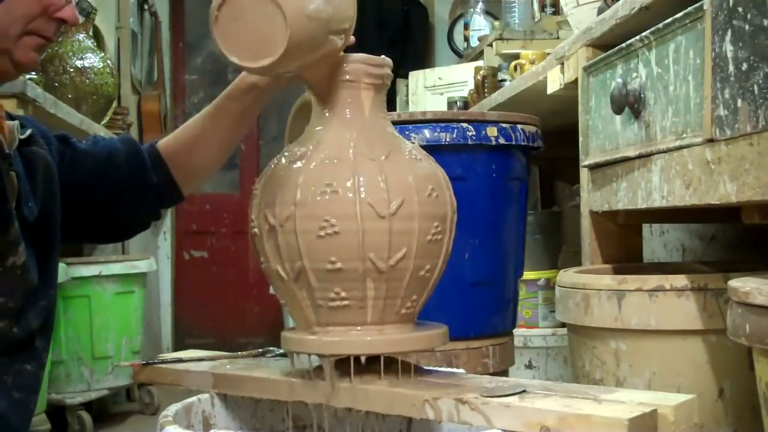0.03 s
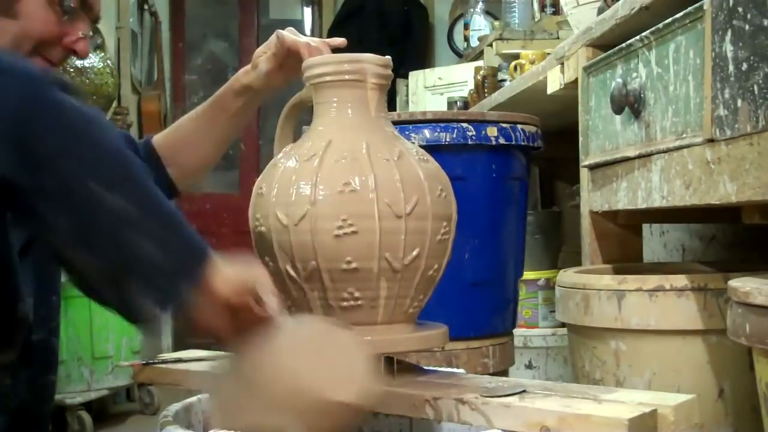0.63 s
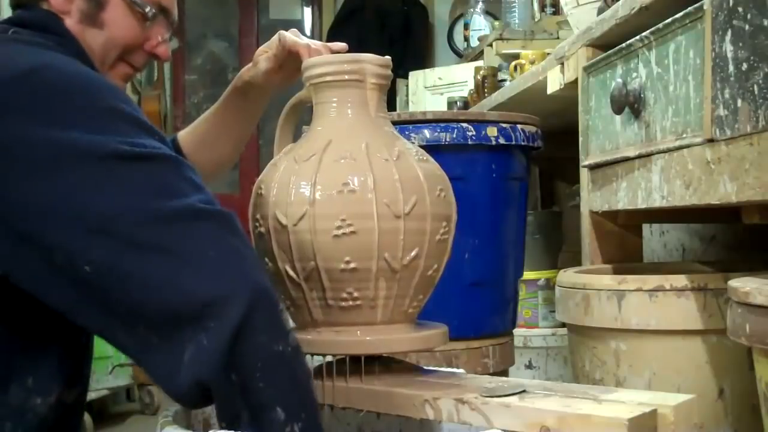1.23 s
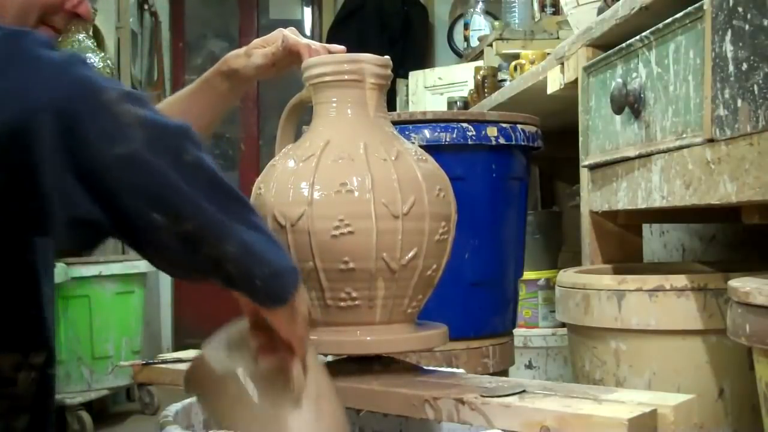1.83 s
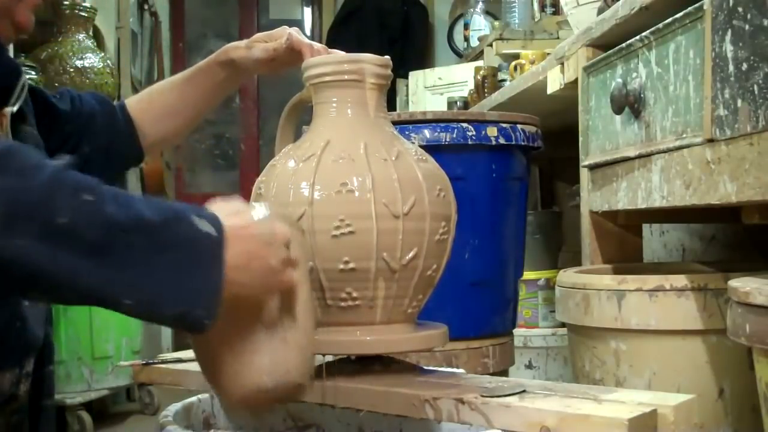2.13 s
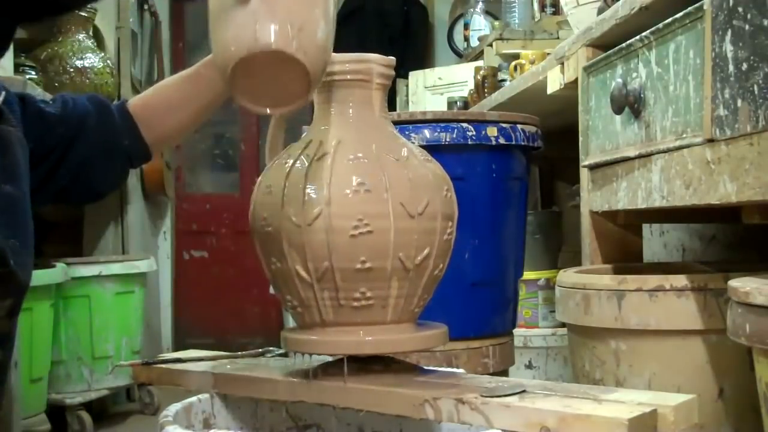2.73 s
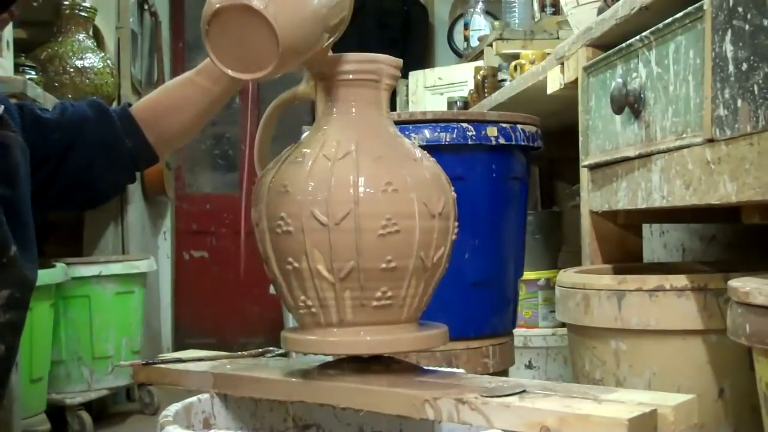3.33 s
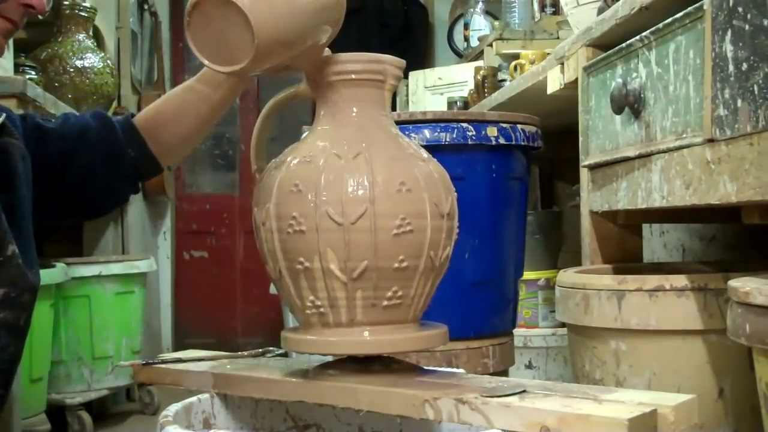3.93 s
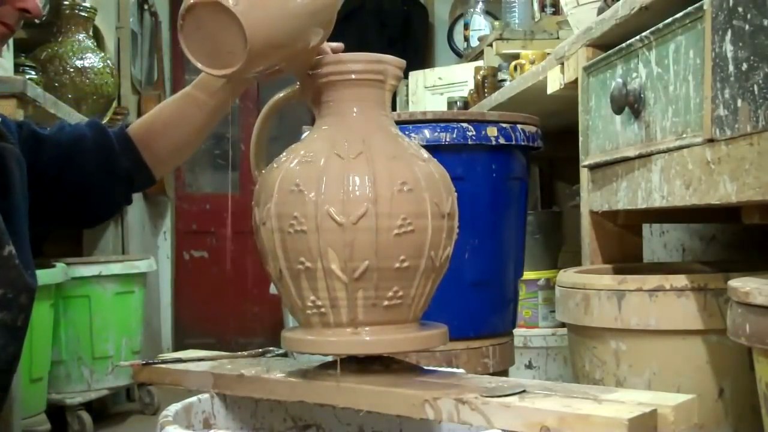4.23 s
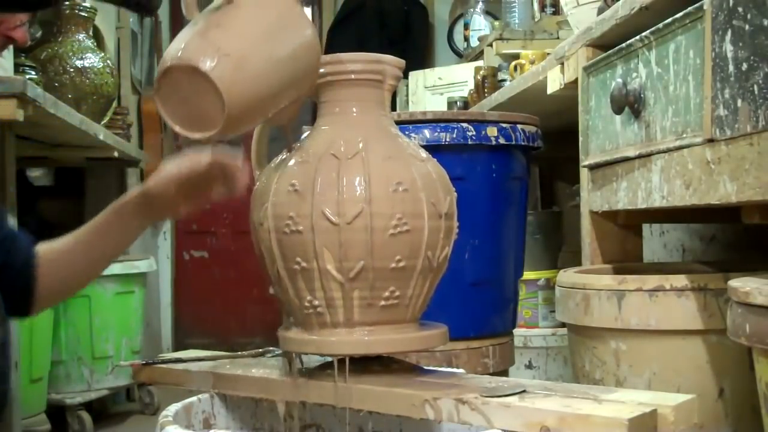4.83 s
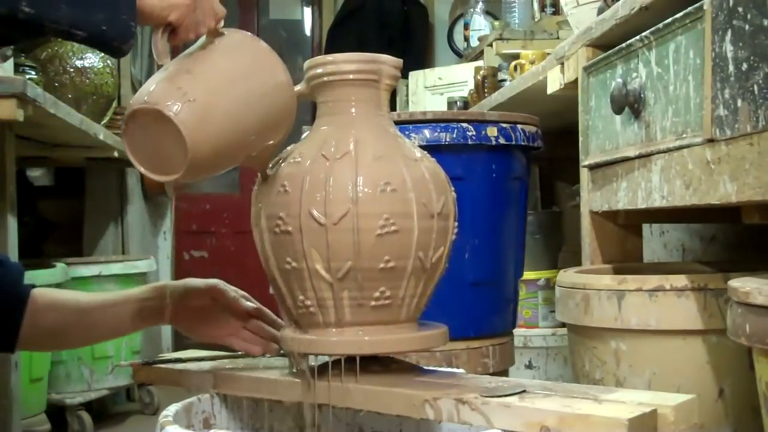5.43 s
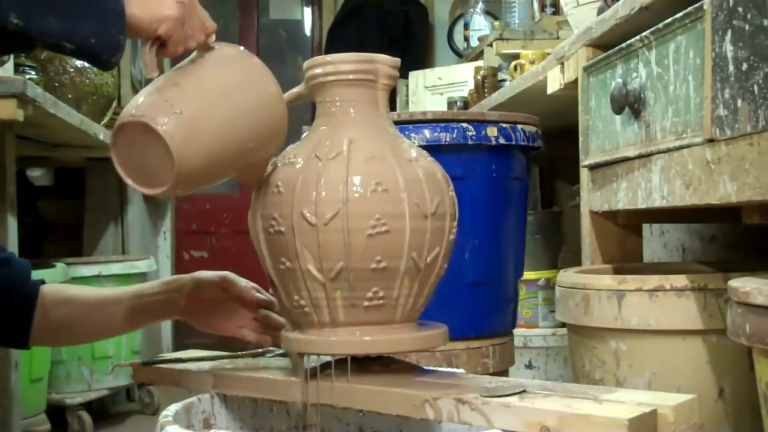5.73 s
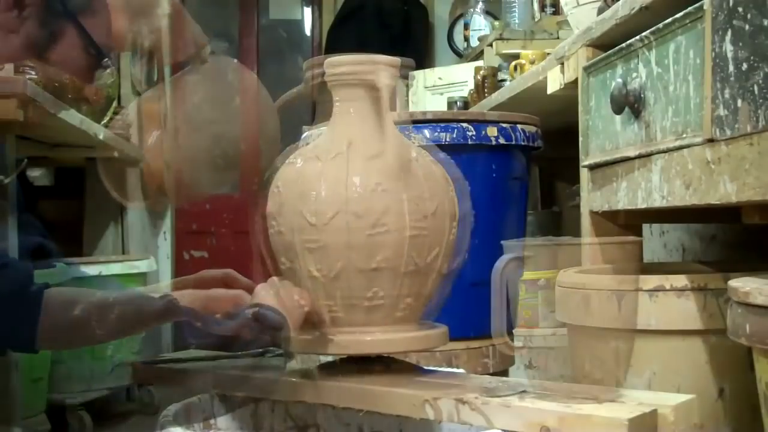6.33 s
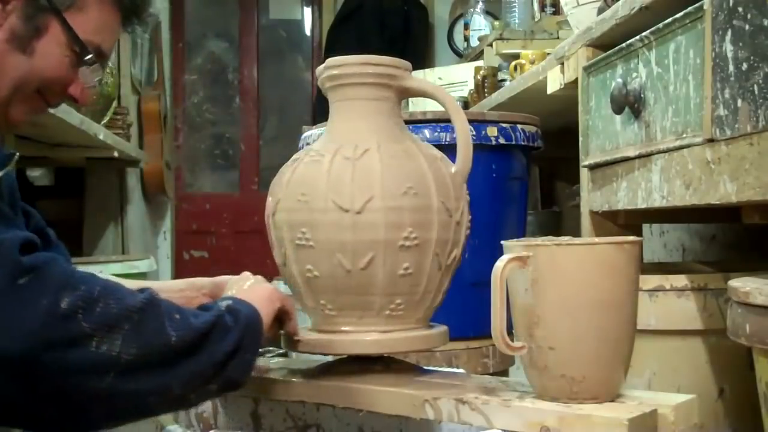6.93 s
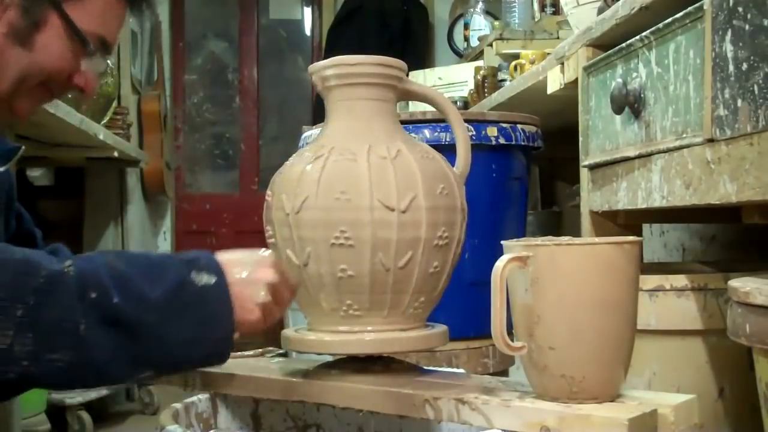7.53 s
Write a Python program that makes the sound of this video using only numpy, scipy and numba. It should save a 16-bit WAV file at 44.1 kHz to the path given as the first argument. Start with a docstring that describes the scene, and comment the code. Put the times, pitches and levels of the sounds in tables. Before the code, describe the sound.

Close to a tub in a small workshop, liquid clay spatters down from a pitcher in a bright, wet patter. Early on a jug gives two dead knocks and gulps as it refills. The flow dwindles to drips, plinks and a few fine snaps, builds with another pour and fades out. A faint hum lies underneath, and the sound leans to the left.

```python
"""Close to a tub in a small workshop, on two closely spaced microphones, the left one louder.
Liquid clay slip, poured over a tall pitcher, patters off its foot into the tub over a faint hum; drops
smack and trap bubbles. Just before one second a jug bumps the tub and is dunked to refill with dull
gulps. The run-off thins to drips, with small glugs and later the snap of thin films. It swells again
with a second pour at five and a half seconds; then trickle and hum fade into the still air."""
import sys
import numpy as np
from scipy import signal
from scipy.fft import rfft, irfft, next_fast_len
from scipy.io import wavfile
from scipy.ndimage import uniform_filter1d
from numba import njit

SR = 44100
rng = np.random.default_rng(int(sys.argv[2]) if len(sys.argv) > 2 else 0)


def unload_wav(signal):
    """Save mono or channel-first audio to the path in sys.argv[1] as 16-bit WAV at rate SR, clipped to [-1, 1]."""
    wavfile.write(
        sys.argv[1],
        SR,
        np.round(np.clip(np.atleast_2d(signal).T, -1, 1) * 32767).astype(np.int16),
    )


N = 334719
T = np.arange(N) / SR

# Pours off the pitcher's foot. Each row: start and end of full flow in seconds, relative level in dB.
POURS = [(0, 0.55, -34), (5.501, 5.75, -33)]
# The thick threads break and only fine spray falls.
# Each row: middle in seconds, half length in seconds, dip of the patter's body in dB.
LULLS = [(0.296, 0.055, -33.5), (0.678, 0.041, -10), (3.444, 0.13, -25), (6.416, 0.029, -5)]
# Gushes as the jug is dunked, lifted or tipped.
# Each row: start in seconds, length in seconds, relative levels of spray and of body in dB.
GUSHES = [(0.381, .09, -38, -46), (0.936, .09, -23.5, -41), (1.05, .1, -30.5, -38.5),
          (1.387, .13, -49.5, -44), (1.784, .05, -36, -46.5), (1.959, .21, -42, -50),
          (2.315, .34, -46, -60), (3.937, .03, -47, -54.5), (4.479, .065, -41, -82), (4.69, .07, -52, -46),
          (4.959, .24, -39.5, -71), (5.45, .3, -38, -47)]
# Tone of the patter from close by. Each row: frequency in Hz, gain in dB.
PATTER_TONE = [(80, -33), (350, -31.5), (560, -14), (1100, -9), (1900, -13), (3000, -6.5), (4500, -7.5),
               (7500, 0), (8500, -11.5), (10500, -23), (14500, -29)]
# Electric hum in the room. Each row: frequency in Hz, rms level in dB ahead of the microphones.
HUM_TONES = [(96.9, -72), (209.9, -79)]
# Room tone of the workshop. Each row: frequency in Hz, gain in dB.
AIR_TONE = [(30, -24), (150, -6), (300, -5.5), (600, -8), (2000, -13), (14000, -20)]
# Sharp smacks: drops on wet clay and two short knocks of the jug.
# Each row: start in seconds, relative level in dB, pitch in Hz, broad spray over the pitched part in dB.
SMACKS = [(0.058, -24.5, 6840, -1), (0.153, -31, 7100, -1), (0.2362, -21, 6800, -24),
          (0.2644, -52, 7200, -8), (0.3077, -40, 5400, -19), (0.386, -28.5, 7070, 5),
          (0.484, -28.5, 3880, -8), (0.537, -25, 6400, -21), (0.661, -29, 2900, -23), (0.828, -27, 2300, 9),
          (1.012, -15.5, 6750, 6), (1.135, -21.5, 4200, 3), (1.426, -32, 3200, -17),
          (1.534, -34.5, 7000, -5), (1.572, -27.5, 6660, 9), (2.03, -28, 6900, -5),
          (3.0675, -38.5, 6400, -1), (3.501, -45.5, 7040, 1), (3.785, -42, 5840, 12),
          (4.0285, -25, 5600, 7), (4.099, -29.5, 4440, -17), (4.203, -42.5, 3930, -4.5),
          (4.239, -33.5, 6500, -10), (4.702, -31.5, 6340, 3.5), (5.114, -32.5, 3550, -2),
          (5.141, -23.5, 2100, -2.5), (5.174, -25.5, 4300, 18), (5.3045, -36.5, 6940, -3),
          (5.4265, -21.5, 5010, -12.5), (5.95, -37.5, 3560, -10), (6.006, -32, 3770, -9.5),
          (6.315, -28, 7600, -2), (6.393, -33.5, 3430, 0), (6.655, -32, 6940, 24), (6.809, -37.5, 2760, -4),
          (6.9785, -40.5, 6460, -7), (7.164, -45.5, 4760, 7), (7.286, -46, 7200, -22)]
# Trapped bubbles, gloops to plinks, and at 0.891 s and 1.2065 s the hollow ring of the jug as it bumps the tub.
# Each row: start in seconds, relative level in dB, nominal pitch in Hz.
BUBBLES = [(0.108, -29, 457), (0.275, -37, 1760), (0.616, -33, 2870), (0.891, -34.5, 457),
           (1.2065, -25.5, 462), (1.401, -36.5, 1027), (1.896, -36, 1270), (2.064, -34, 1540),
           (2.405, -42, 974), (2.528, -36.5, 1040), (2.645, -34.5, 2860), (2.899, -40.5, 4000),
           (3.1177, -36.5, 4200), (3.24, -41, 1206), (3.422, -45, 3400), (3.515, -36, 1575),
           (3.662, -38, 1990), (3.825, -41, 1260), (3.984, -36, 1640), (4.252, -41, 835),
           (4.339, -36, 1350), (4.472, -40, 1300), (6.911, -44, 1200), (7.023, -45.5, 2330),
           (7.182, -50.5, 1080), (7.343, -58.5, 1230)]
# The jug against the tub wall. Each row: start in seconds, relative level in dB.
BUMPS = [(0.8277, -26), (1.2069, -20)]
# The jug going under. Each row: start in seconds, relative level in dB, treble tilt in dB per two octaves.
GULPS = [(0.828, -22.5, -3), (0.943, -29.5, -3), (1.018, -24.5, 3), (1.217, -24.5, 1.5), (1.524, -31, 4.5),
         (1.837, -33, -5), (1.895, -33.5, 6), (2.165, -34.5, 0), (2.213, -32, -1.5), (3.347, -41, 3.5),
         (4.046, -42.5, 5), (4.253, -46.5, 5), (4.632, -40.5, 0.5), (5.715, -45.5, -13)]
# Resonances of the tub of slip. Each row: frequency in Hz, width of one filter pass in Hz, gain in dB.
TUB_MODES = [(162, 80, 0), (198.4, 120, 3), (436, 42, -3.5), (523, 450, -0.5), (792, 170, -1.5),
             (1080, 460, -2)]
# Thick threads plunging into the tub. Each row: start in seconds, relative level in dB, first pitch in Hz.
GLUGS = [(1.435, -39, 857), (2.772, -49, 673), (3.619, -43.5, 750), (3.783, -47.5, 752), (5.342, -45, 585),
         (5.558, -37.5, 709), (5.70, -40.5, 555), (5.852, -35, 740), (5.967, -41.5, 485),
         (6.193, -37.5, 898), (6.495, -45, 479)]
# Thin films of slip snapping. Each row: start in seconds, relative level in dB.
SNAPS = [(4.7015, -28.5), (4.926, -23.5), (6.317, -12.5)]
# Air resonances of the tub, ringing briefly after each wet sound.
# Each row: frequency in Hz, gain over the passing sound in dB.
TUB_AIR_MODES = [(208, -0.5), (512, 2), (757, -3), (1041, -2.5), (1211, 1.5), (1487, -6.5), (1767, 3.5),
                 (2083, 1)]
# The left microphone's lead, greatest in the top treble. Each row: frequency in Hz, left minus right in dB.
MIC_BALANCE = [(100, 7.5), (6000, 3), (7500, 16), (9000, 15.5), (13000, 18)]


def undb(db):
    """Decibels to gain."""
    return 10 ** (np.asarray(db) / 20)


def unit(x):
    """Scale to rms 1."""
    return x / np.sqrt(np.mean(x ** 2))


def add(out, start_s, x, db):
    """Mix x in at start_s with its loudest 5 ms at db."""
    i = max(int(start_s * SR), 0)
    loudest = np.sqrt(uniform_filter1d(x ** 2, SR // 200).max())
    out[i:i + len(x)] += (x * undb(db) / loudest)[:N - i]


def colour(x, points):
    """Filter by a (Hz, dB) curve."""
    hz, db = np.transpose(points)
    size = next_fast_len(x.shape[-1] + 4096)
    bin_hz = np.maximum(np.arange(size // 2 + 1) * SR / size, 1)
    gain = undb(np.interp(np.log(bin_hz), np.log(hz), db))
    return irfft(rfft(x, size) * gain, size)[..., :x.shape[-1]]


def resonate(x, hz, width_hz):
    """One resonance, gain 1 at its centre."""
    return signal.lfilter(*signal.iirpeak(hz, max(hz / width_hz, .5), fs=SR), x)


def passband(x, kind, hz, order=2):
    """Gentle low-pass or high-pass."""
    return signal.sosfilt(signal.butter(order, hz, kind, fs=SR, output="sos"), x)


def steady(x, window_s):
    """Even out slow swells, leaving the grain."""
    window = int(window_s * SR)
    power = uniform_filter1d(uniform_filter1d(x ** 2, window), window)
    return x / np.sqrt(np.abs(power) + np.mean(x ** 2) / 100)


@njit
def grains(start, hz, cycles, size, rise):
    """Damped sines that fall 50 dB over their cycles while the pitch rises."""
    out = np.zeros(N)
    for k in range(len(start)):
        first, count, phase = int(start[k] * SR), int(cycles[k] / hz[k] * SR) + 2, 0.
        for i in range(min(count, N - first)):
            phase += 2 * np.pi * hz[k] * (1 + rise * i / count) / SR
            out[first + i] += size[k] * np.exp(-5.75 * i / count) * np.sin(phase)
    return out


def arrivals(rate):
    """Random times at a changing rate per second."""
    due = np.cumsum(rate) / SR
    return np.interp(np.sort(rng.uniform(0, due[-1], int(due[-1]))), due, T)


def flow_db(swell_db_per_s=30, drain_db_per_s=7, fade_from_s=6.62, fade_db_per_s=42):
    """Each pour builds quickly, holds and, being thick, drains slowly; the last trickle fades away."""
    pours = [db - swell_db_per_s * np.maximum(full - T, 0) - drain_db_per_s * np.maximum(T - until, 0)
             for full, until, db in POURS]
    return np.max(pours, axis=0) - fade_db_per_s * np.maximum(T - fade_from_s, 0)


def patter_gains(gush_attack_s=.009, gush_release_s=.018):
    """Gains of fine spray and duller body: the flow with its lulls, and the gushes on top."""
    db = flow_db()
    spray_power = undb(db) ** 2
    body_power = undb(db - 11 + .3232 * (db.max() - db)) ** 2  # a thin flow falls in fatter, duller drops
    for middle, half_s, dip_db in LULLS:
        body_power *= undb(dip_db * np.exp(-((T - middle) / half_s) ** 4)) ** 2
    for start, length, spray_db, body_db in GUSHES:
        attack = np.clip((T - start) / gush_attack_s, 0, 1)
        gush = attack * np.exp(-np.maximum(T - start - length, 0) / gush_release_s)
        spray_power += (undb(spray_db) * gush) ** 2
        body_power += (undb(body_db) * gush) ** 2
    return np.sqrt(spray_power), np.sqrt(body_power)


def spatter(rate, lo_hz, hi_hz, spread_db, scatter_s, cycles, ticks):
    """Each drop bursts into tiny ticks near its own pitch."""
    landings = arrivals(rate)[:, None]
    shape = (len(landings), ticks)
    start = landings + rng.exponential(scatter_s, shape)
    hz = rng.uniform(lo_hz, hi_hz, landings.shape) * np.exp(.12 * rng.standard_normal(shape))
    hz = np.minimum(hz, SR / 2)
    db = spread_db * rng.standard_normal(landings.shape).clip(-2, 2) + 4 * rng.standard_normal(shape)
    size = undb(db) * np.sqrt(hz) * rng.choice([-1, 1], shape)
    drops = grains(start.ravel(), hz.ravel(), np.full(hz.size, float(cycles)), size.ravel(), rise=.045)
    return colour(drops, PATTER_TONE)


def runoff():
    """Threads of slip break into drops: more flow, more drops, with small bubbles among them."""
    spray_gain, body_gain = patter_gains()
    rate = 1000 * spray_gain ** .38  # drops per second
    spray = spatter(rate, lo_hz=2000, hi_hz=13450, spread_db=2.4, scatter_s=.006, cycles=9.9, ticks=26)
    spray = passband(spray, "high", 1200)
    fat_drops = spatter(rate, lo_hz=776, hi_hz=2530, spread_db=2.7, scatter_s=.005, cycles=4.5, ticks=5)
    blip_starts = arrivals(rate / 5)
    count = len(blip_starts)
    blip_hz = 530 * 2 ** rng.uniform(0, 1.893, count)
    blips = grains(blip_starts, blip_hz, cycles=rng.uniform(18, 40, count), size=rng.random(count), rise=.25)
    body = undb(-3) * steady(fat_drops, .1) + undb(-9.5) * steady(colour(blips, PATTER_TONE), .2)
    return spray_gain * steady(spray, .036) + body_gain * body


def hum(fade_from_s, silent_s):
    """A steady electric hum, far under the pour, that fades out near the end."""
    tones = sum(undb(db) * np.sqrt(2) * np.sin(2 * np.pi * hz * T) for hz, db in HUM_TONES)
    return tones * np.interp(T, [fade_from_s, silent_s], [1, 0])


def noise_pair(size, apart_hz):
    """Noise at two close microphones: alike in the bass, unrelated in the treble."""
    mid, side = rng.standard_normal((2, size))
    side = passband(side, "high", apart_hz, order=1)
    return np.array([mid + side, mid - side]) / np.sqrt(2)


def still_air():
    """Soft, dark room tone all round the microphones."""
    return unit(colour(noise_pair(N, apart_hz=2300), AIR_TONE))


def stray_smacks(per_s=6, spread_db=3, lo_hz=2740, hi_hz=7200, spray_db=-7):
    """Rows of lesser smacks that fall loosely spaced, their level following the flow."""
    count = int(per_s * N / SR)
    when, size, pitch = rng.random((count, 3)).T
    start = (np.arange(count) + when) / per_s
    db = np.interp(start, T, flow_db()) - 3.5 + spread_db * (2 * size - 1)
    hz = lo_hz * (hi_hz / lo_hz) ** pitch
    return [(*row, spray_db) for row in zip(start, db, hz)]


def smacks():
    """A drop or a knock of the jug gives a pitched burst of ticks; a drop rings the pocket it opens."""
    out, t = np.zeros(N), T[:SR // 16]
    for start, db, hz, spray_db in list(SMACKS) + stray_smacks():
        ticks = rng.standard_normal(len(t)) * undb(4 * rng.standard_normal(len(t)).clip(-2, 2))
        burst = ticks * np.exp(-t / .0075) * (1 - np.exp(-t / .0004))
        pitched = resonate(resonate(burst, hz, hz / 2.5), hz, hz / 2.5)
        spray = colour(burst, PATTER_TONE)
        add(out, start, unit(pitched) + undb(spray_db) * unit(spray), db + 4.5)
    return out


def bubbles(slosh_db=-17.5, tick_db=-9.5):
    """A tick, then a brief ring that rises in pitch: mostly a drop trapping a bubble as it surfaces, twice the
    hollow of the jug ringing as it bumps the tub."""
    out, t = np.zeros(N), T[:SR // 6]
    for start, db, hz in BUBBLES:
        age = t * hz / 6  # in decay times of six cycles
        pitch = hz * (.928 + .13 * (1 - np.exp(-age / 2)))
        ring = np.sin(2 * np.pi * np.cumsum(pitch) / SR) * np.exp(-age) * (1 - np.exp(-t * hz))
        tick = unit(colour(rng.standard_normal(len(t)), PATTER_TONE)) * np.exp(-t / .004)
        slosh = unit(resonate(rng.standard_normal(len(t)), hz, hz / 2)) * np.exp(-age)
        add(out, start, ring + undb(slosh_db) * slosh + undb(tick_db) * tick, db)
    return out


def jug_bumps():
    """The jug meets the tub wall: a hard, dead knock, smothered at once by the slip."""
    out, t = np.zeros(N), T[:SR // 16]
    for start, db in BUMPS:
        blow = passband(rng.standard_normal(len(t)), "low", 2900) * np.exp(-t / .0019)
        add(out, start, resonate(blow, hz=500, width_hz=600), db)
    return out


def jug_gulps(attack_s=.009, decay_s=.017):
    """Slip closes over the jug: a soft shove that booms in the tub."""
    out, t = np.zeros(N), T[:SR // 3]
    for start, db, tilt_db in GULPS:
        shove = rng.standard_normal(len(t)) * np.exp(-t / decay_s) * (1 - np.exp(-t / attack_s))
        boom = undb(-18) * resonate(shove, hz=300, width_hz=300)
        for hz, width, mode_db in TUB_MODES:
            gain = undb(mode_db + tilt_db * np.log2(hz / 300) / 2)
            boom += gain * resonate(resonate(shove, hz, width), hz, width)
        add(out, start, boom, db - 6.5)
    return out


def glugs(shortest_s=.0251, mean_rise_octaves=.38, roughness=.32):
    """An air pocket is dragged under: it shrinks and so climbs in pitch, unsteadily, at its own pace."""
    out, t = np.zeros(N), T[:SR // 16]
    for start, db, hz in GLUGS:
        stretch, climb = rng.random(2)
        age = np.minimum(t / (shortest_s * (1 + stretch)), 1)
        wobble, churn = (unit(passband(rng.standard_normal(len(t)), "low", 111)) for _ in range(2))
        pitch = hz * 2 ** (mean_rise_octaves * (.5 + climb) * age + wobble / 16)
        phase = 2 * np.pi * np.cumsum(pitch) / SR
        add(out, start, np.sin(phase) * (1 + roughness * churn) * np.sin(np.pi * age), db)
    return out


def film_snaps():
    """A film of slip tears with a few very fine, bright clicks."""
    out, t = np.zeros(N), T[:SR // 20]
    for start, db in SNAPS:
        clicks = rng.standard_normal(len(t)) ** 3 * np.exp(-t / .0045)
        add(out, start, resonate(resonate(clicks, 10900, 5000), 10000, 5000), db - 14.5)
    return out


def workshop(dry, near_db, near_s, tail_db, t60_s, spots=3):
    """Quick echoes from tub and shelves reach the microphones, then a short room tail."""
    t = T[:SR // 2]
    near = np.exp(-t / near_s) * (t > .001)
    tail = undb(-60 * t / t60_s) * (1 - np.exp(-t / .0027))
    decay = (undb(near_db) * unit(near) + undb(tail_db) * unit(tail)) / np.sqrt(len(t))
    spot = (T // .02) % spots  # drops land in turn at a few spots, each with its own echoes
    echoes = np.zeros((2, N))
    for k in range(spots):
        share = uniform_filter1d(1. * (spot == k), SR // 100)
        response = noise_pair(len(t), apart_hz=2100) * decay
        echoes += signal.fftconvolve((dry * share)[None], response, axes=1)[:, :N]
    return dry + echoes


def tub_ring(x):
    """The air in the tub rings briefly after each wet sound."""
    return x + sum(undb(db) * resonate(x, hz, width_hz=17) for hz, db in TUB_AIR_MODES)


def scene():
    """From beside the tub: wet sounds, each place with its own echoes, over hum and still air."""
    patter = workshop(runoff(), near_db=-2, near_s=.0048, tail_db=-.5, t60_s=.16)
    sharp = workshop(smacks() + film_snaps(), near_db=-12.5, near_s=.0021, tail_db=-.5, t60_s=.29)
    in_tub = bubbles() + jug_bumps() + jug_gulps() + glugs()
    hollow = workshop(in_tub, near_db=-4, near_s=.014, tail_db=-2, t60_s=.34)
    background = hum(fade_from_s=5.5, silent_s=7.1) + undb(-62.5) * still_air()
    return tub_ring(undb(-.5) * (patter + sharp) + hollow) + background


def record(dry):
    """Two unequal microphones, the left reached a sample later; peaks round off; a steep top cut."""
    left = [(hz, 20 * np.log10(2 / (1 + undb(-db)))) for hz, db in MIC_BALANCE]
    right = [(hz, 20 * np.log10(2 / (1 + undb(db)))) for hz, db in MIC_BALANCE]
    heard = np.array([np.roll(colour(dry[0], left), 1), colour(dry[1], right)])
    top_cut = signal.ellip(10, .2, 80, 14700, fs=SR, output="sos")
    return signal.sosfilt(top_cut, np.tanh(heard))


dry = scene()
out = record(dry)
unload_wav(out)
```